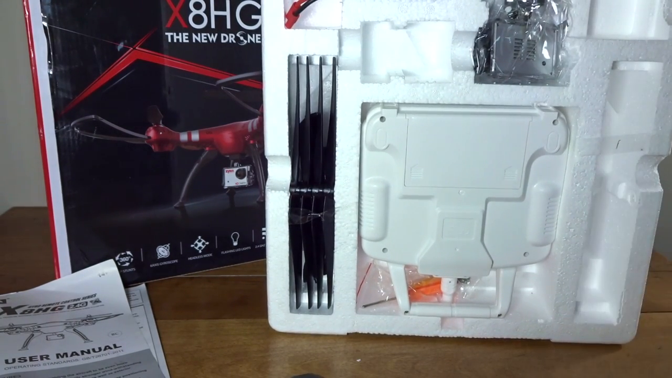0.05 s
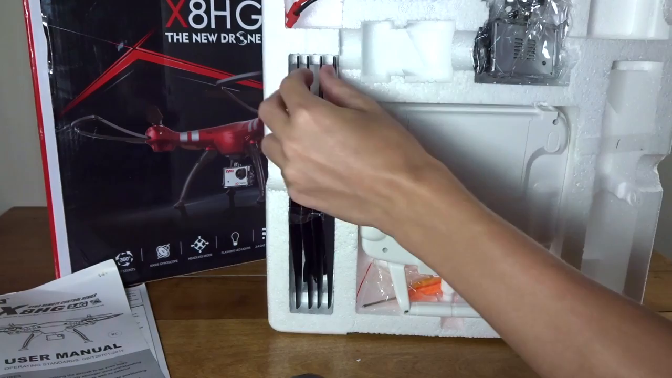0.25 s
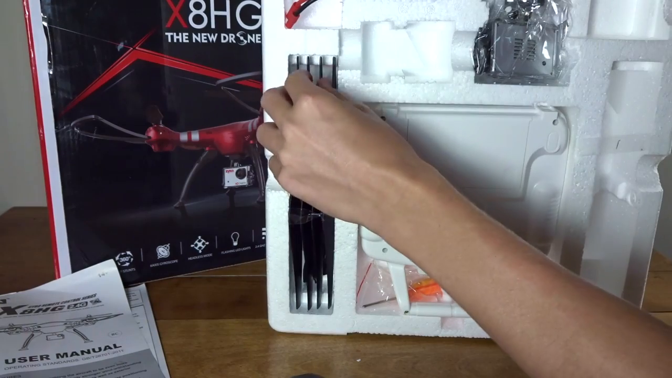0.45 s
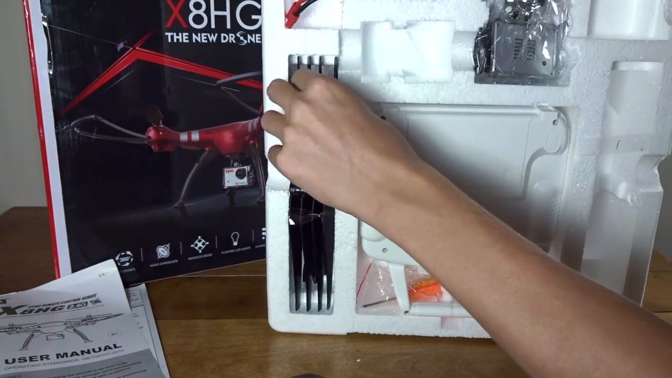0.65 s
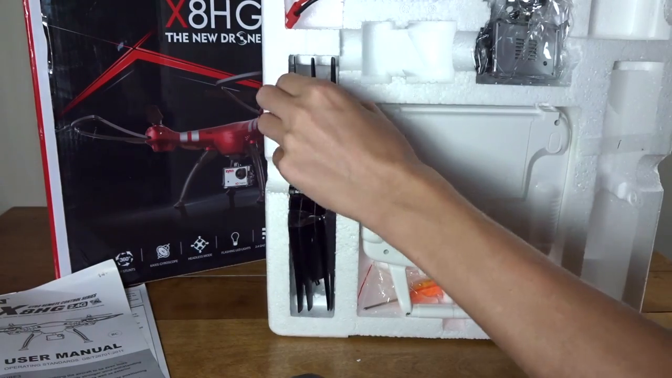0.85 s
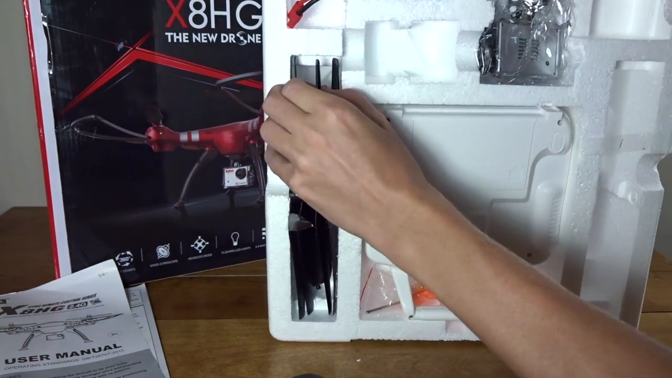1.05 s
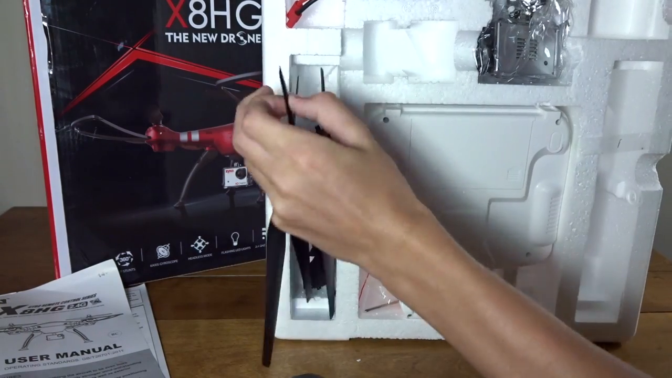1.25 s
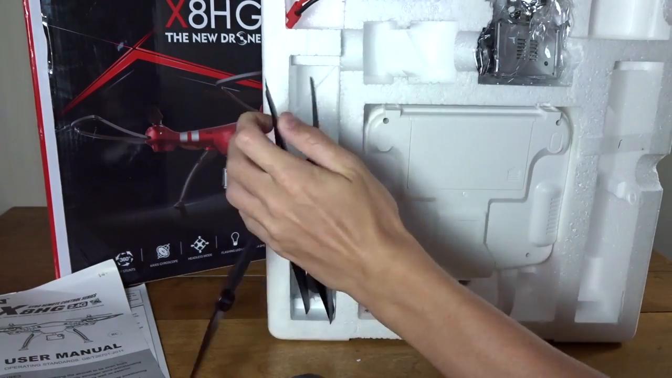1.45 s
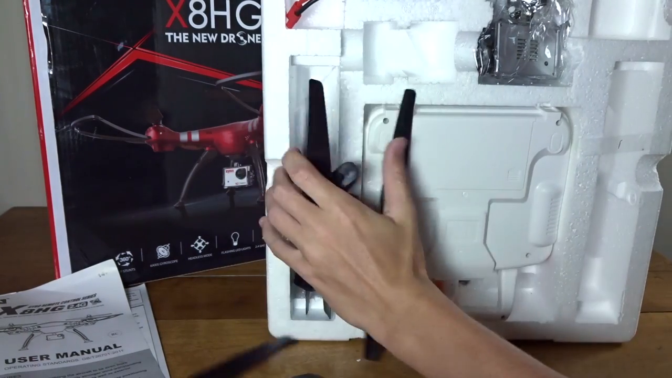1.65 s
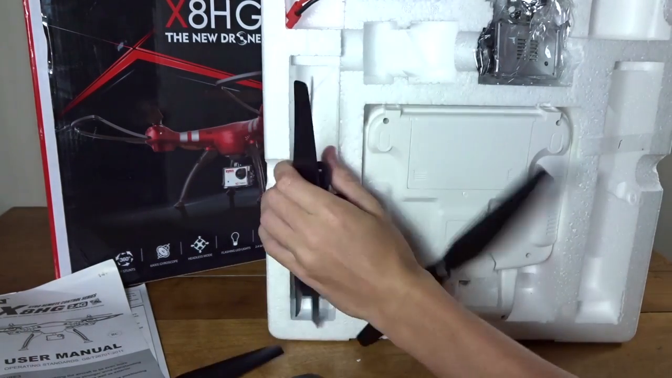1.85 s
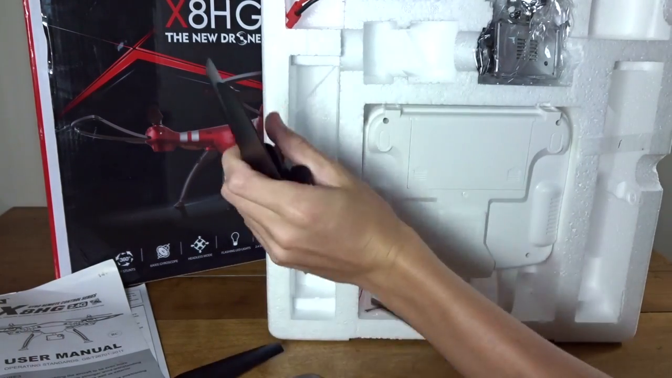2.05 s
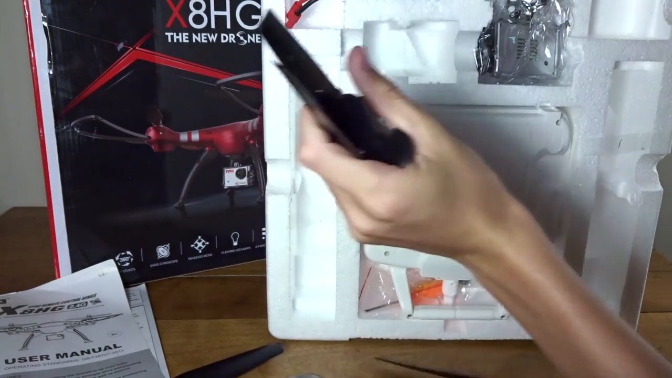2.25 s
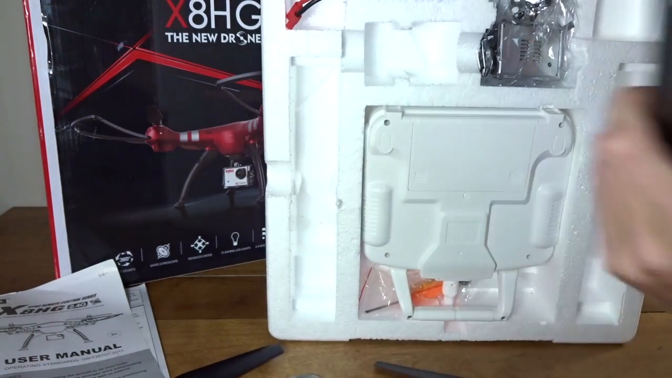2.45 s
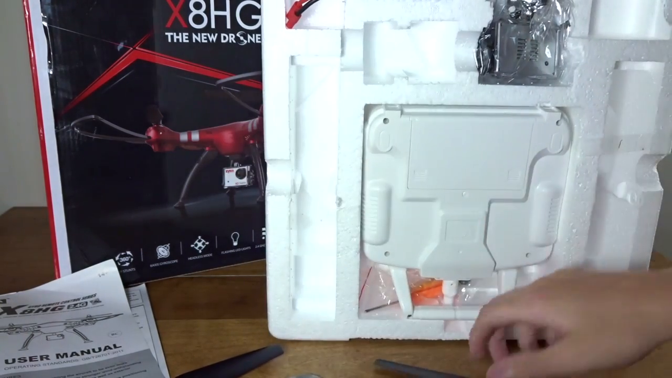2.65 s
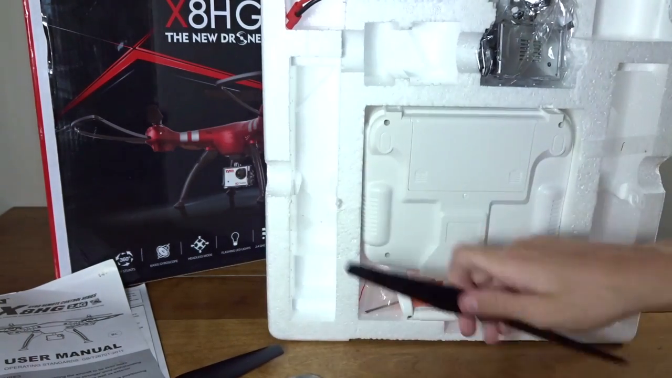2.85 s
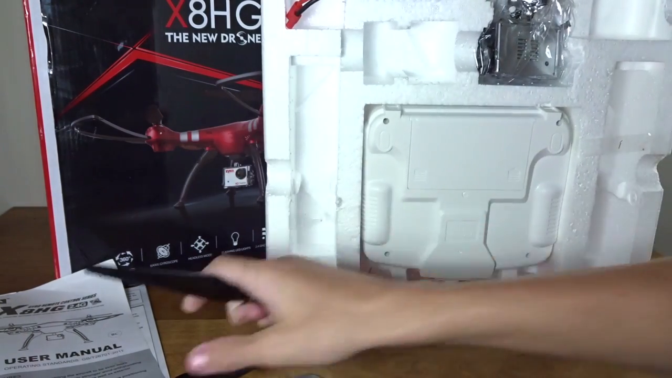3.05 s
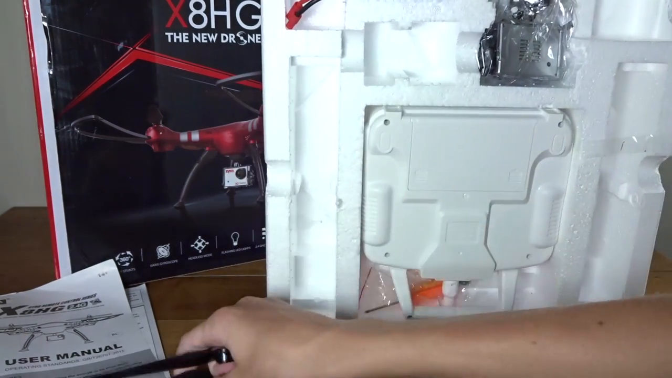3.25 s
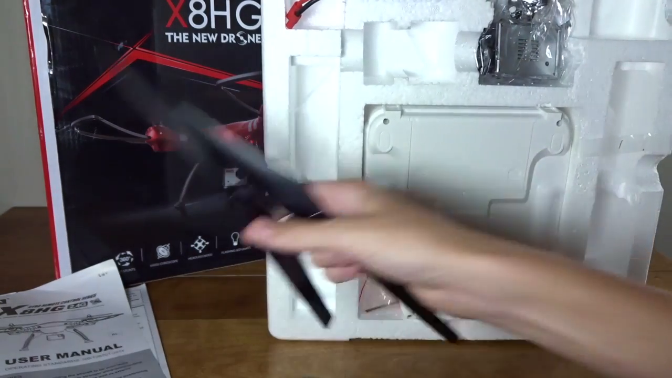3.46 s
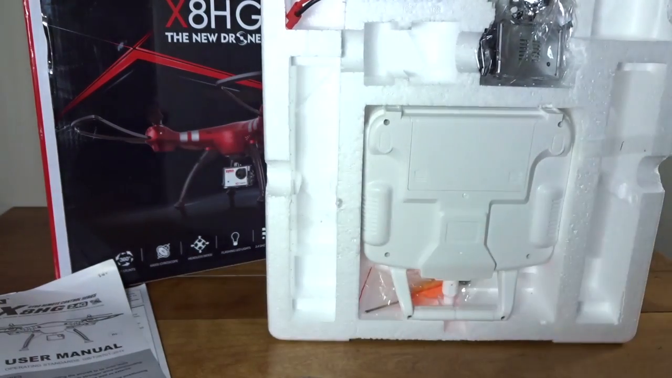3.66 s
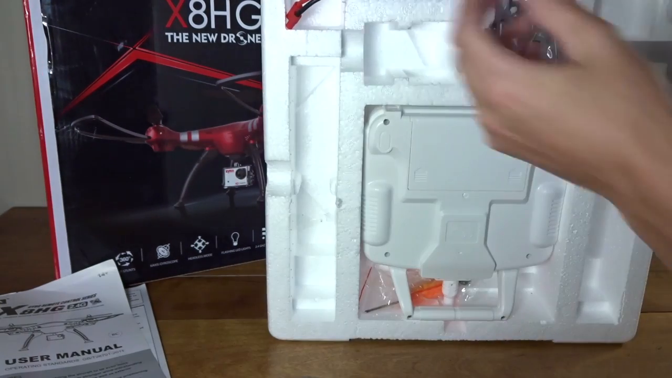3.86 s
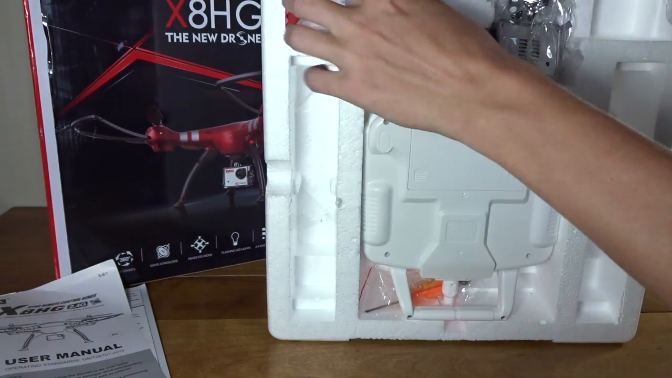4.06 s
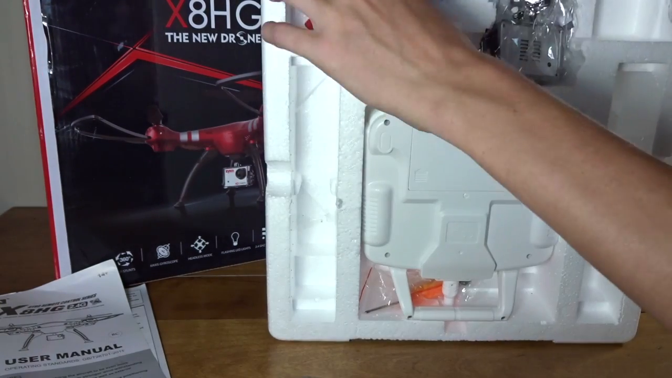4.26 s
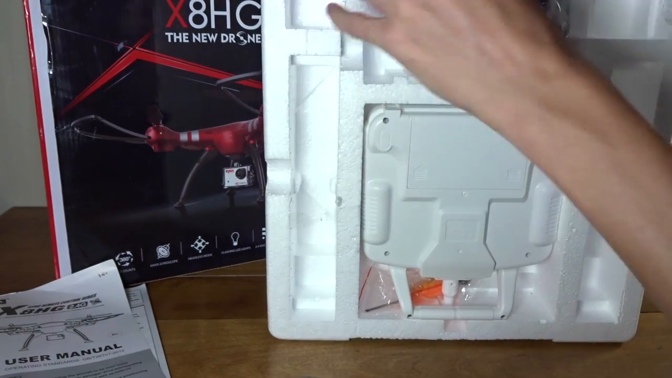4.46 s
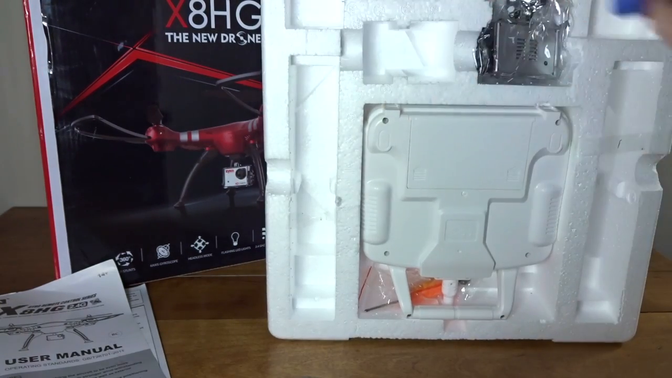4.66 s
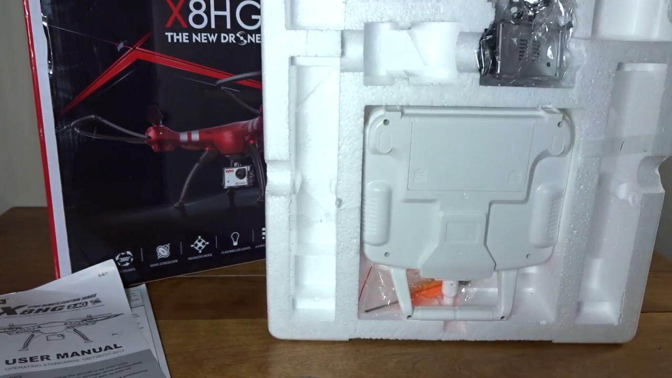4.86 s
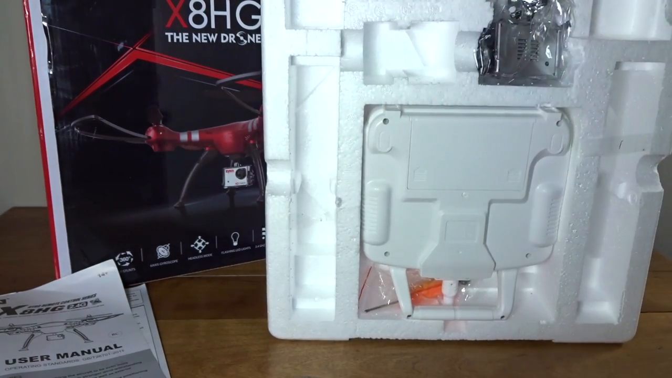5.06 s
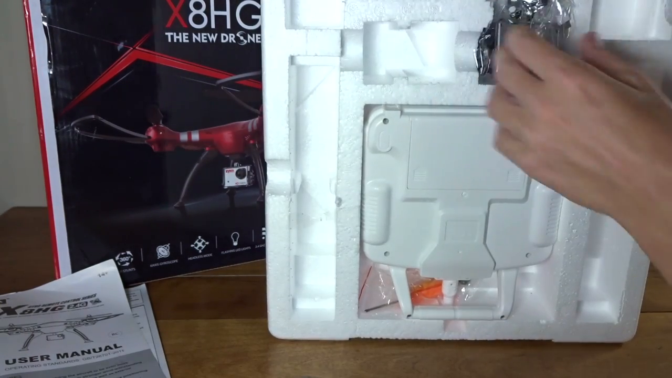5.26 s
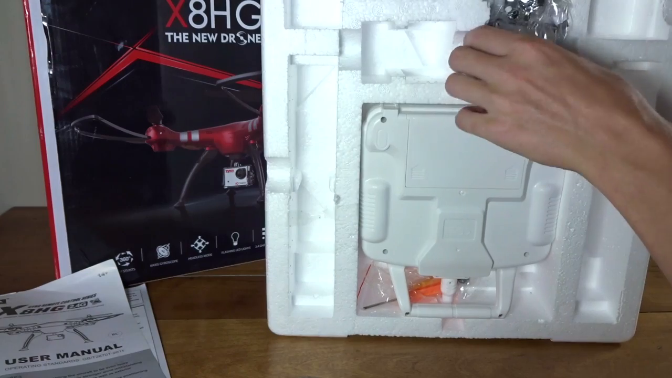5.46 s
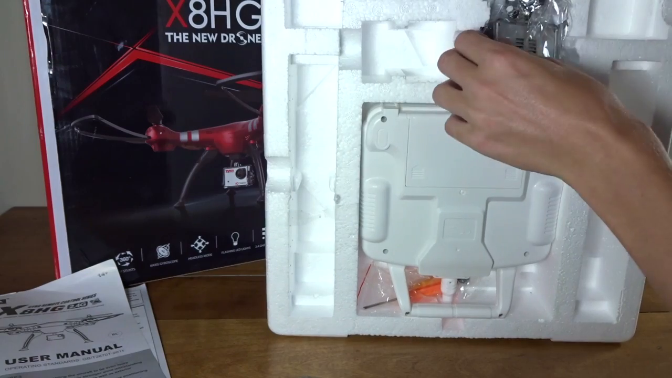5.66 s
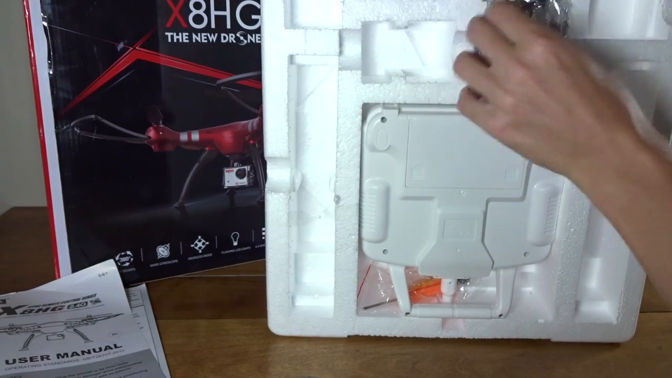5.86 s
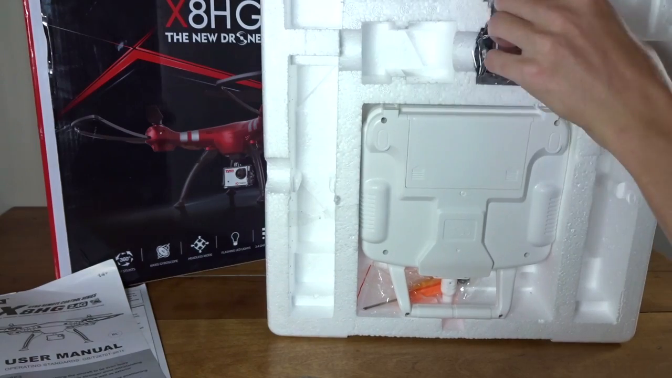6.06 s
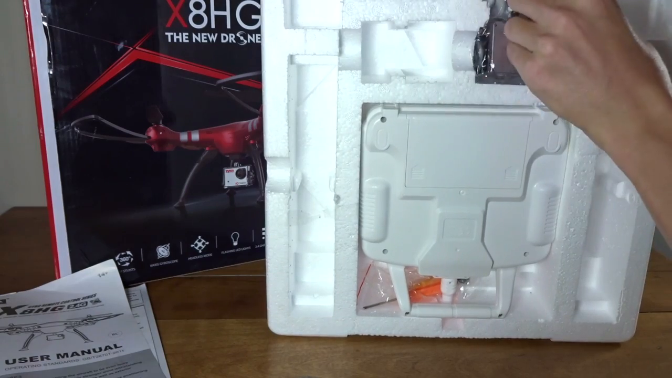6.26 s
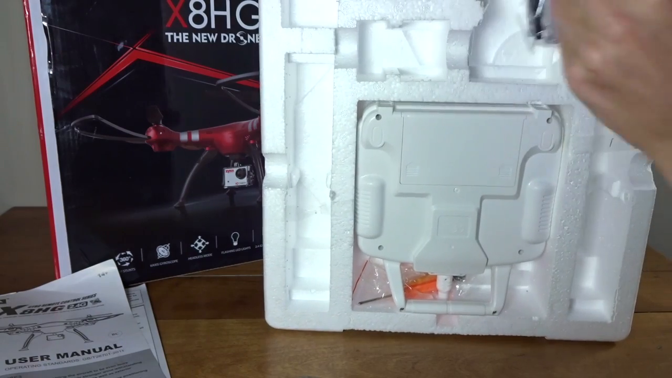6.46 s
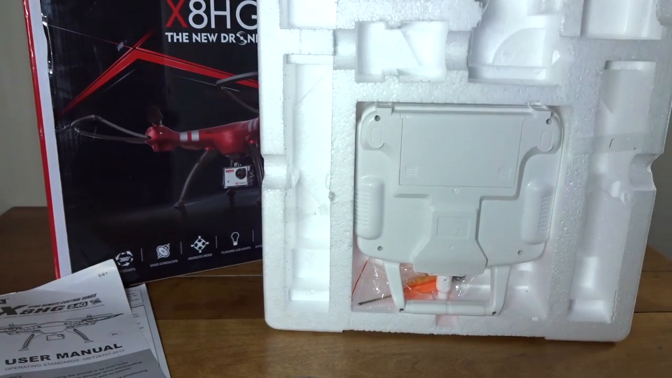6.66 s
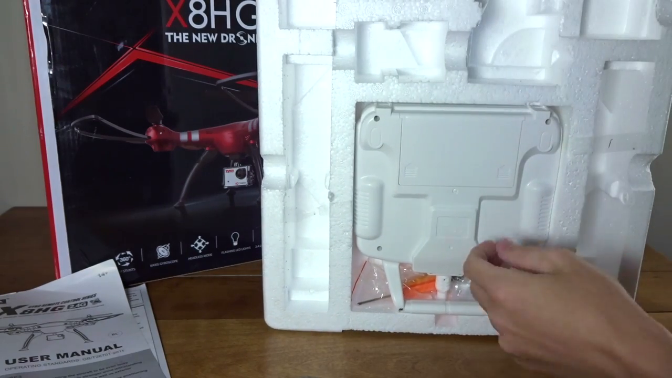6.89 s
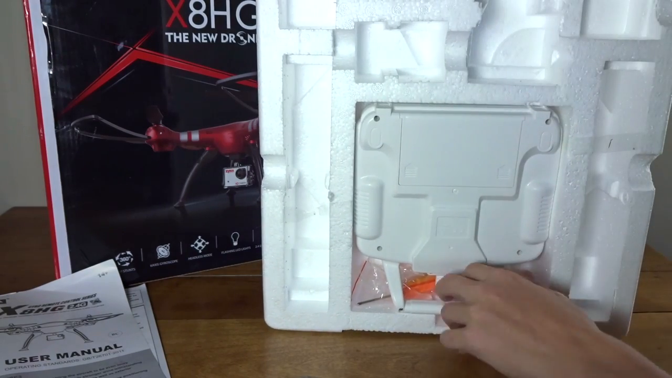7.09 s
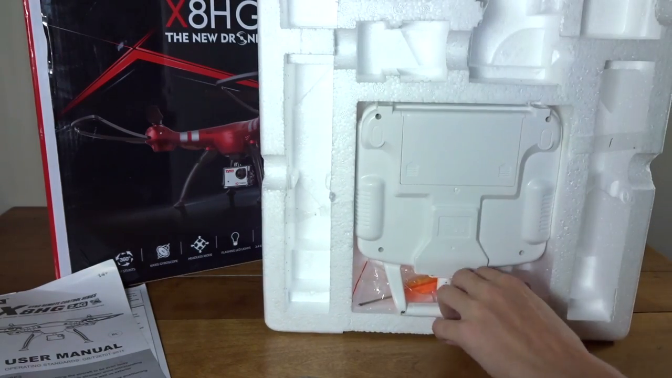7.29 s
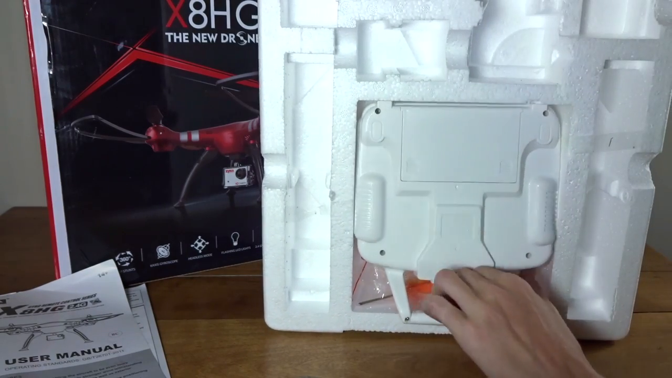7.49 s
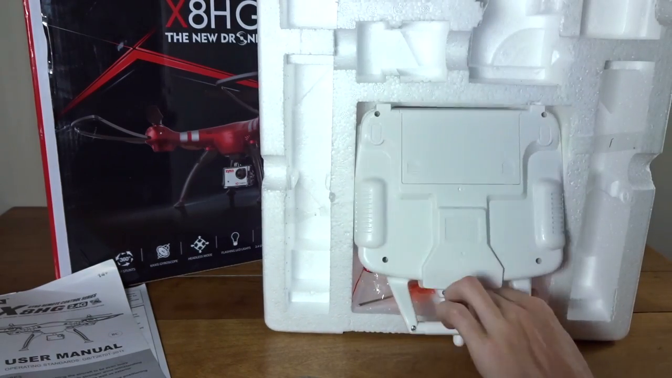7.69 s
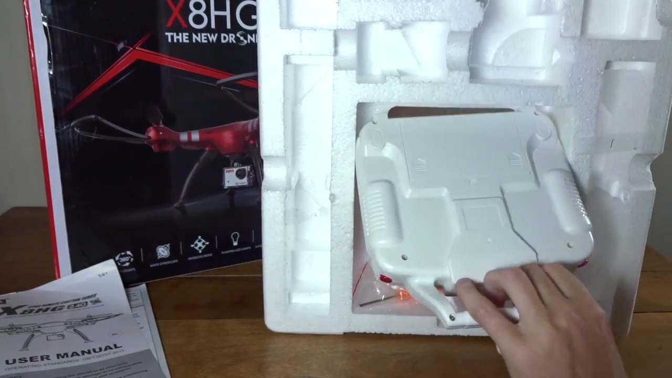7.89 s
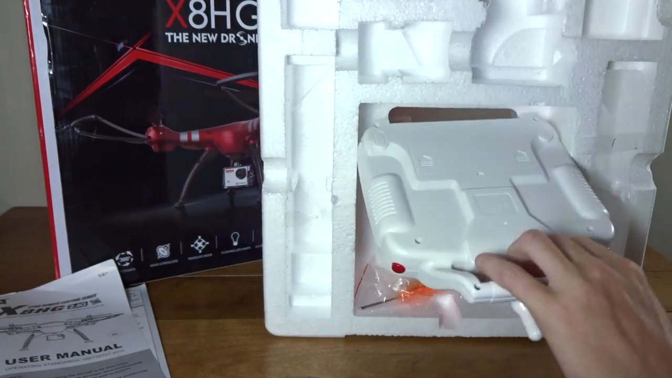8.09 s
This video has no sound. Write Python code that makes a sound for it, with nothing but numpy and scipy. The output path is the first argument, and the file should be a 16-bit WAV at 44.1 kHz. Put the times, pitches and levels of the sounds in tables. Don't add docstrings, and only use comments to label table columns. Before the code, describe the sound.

A small quiet room with soft wide hiss and a barely audible high whistle; handling is close and near centre. At 0.06 s a small hard part snaps slightly right, with an abrupt cut at 0.25. Light foam touches and taps lead to plastic blades being pulled from a hollow foam tray: from 1.3 to 2.5 s dense gritty scrapes, bright ringing clacks, dull knocks and creaks near 1.55 and 1.75. Lighter clacks at 2.85 and 3.3-3.4, then near quiet. Small contacts and foam rubs at 4.3-4.9. From 5.5 to 6.5 s, strong scraping, hollow knocks and sharp plastic ticks; at 6.6-6.9 film crackles crisply at right. Another abrupt cut at 6.89, a pause, then from 7.3 a large shell rubs and drags out, loudest with a creak around 7.6, easing into small squeaks by 8.

```python
import sys
import numpy as np
from scipy import signal
from scipy.io import wavfile
from scipy.ndimage import uniform_filter1d

SR = 44100
rng = np.random.default_rng(int(sys.argv[2]) if len(sys.argv) > 2 else 0)


def store_wav(level_fs):
    pcm = np.round(np.clip(np.atleast_2d(level_fs), -1, 1) * 32767)
    wavfile.write(sys.argv[1], SR, pcm.T.astype(np.int16))


def invert_db(x):
    u = np.asarray(x, float) / 20
    return 10 ** u


N = 358533

SCENE_CHANGES = [
    0,
    .25,
    6.888,
    9,
]
BLADES_GONE_S, BAG_S = 3.7, 6.6

# [full force at t/s, hold/s, force level/dB, lean on the tray/dB, sliding speed/dB]
BLADE_PULLS = [(0.0, 0.024, -45, -17, 5.5), (0.616, 0.017, -58, 14.5, -1), (0.716, 0.015, -52, 9.5, -3),
               (0.766, .01, -51, 5.5, 6), (0.831, 0.024, -38, 3.5, 3), (0.91, 0.14, -44, -3, 4),
               (1.069, 0.087, -41, -5.5, 4), (1.225, 0.057, -51, 6, 7), (1.297, 0.05, -26.5, 3, 2.5),
               (1.489, 0.016, -31, 3, 2.5), (1.471, .01, -38, 7, -2.5), (1.562, 0.043, -30.5, 7, -2.5),
               (1.654, 0.018, -30, 0, 0), (1.703, .02, -29, 1, 0), (1.763, 0.034, -23.5, 4.5, -9),
               (1.815, 0.048, -26.5, -2, -0.5), (1.965, 0.065, -36, -1.5, 4), (2.109, 0.051, -28, -3.5, 4),
               (2.24, 0.013, -32, -1.5, -2), (2.291, 0.042, -29, -0.5, 3), (2.378, 0.031, -30, 1, 4.5),
               (2.486, 0.025, -31, -1.5, -17), (2.57, 0.082, -59, 1, -1), (3.327, 0.04, -44, 5, 3),
               (3.473, 0.037, -58, 6, -4), (3.58, 0.15, -64.5, -2, -2), (3.775, 0.028, -57.5, -2, -14)]
BAG_PULLS = [(5.441, 0.086, -52.5, 5, -5), (5.526, 0.028, -34.5, -5, 1.5), (5.598, 0.026, -27.5, -8.5, 3),
             (5.719, 0.022, -27, -5, 0), (5.81, 0.18, -30.5, -11, 1), (5.937, 0.011, -22.5, -5.5, 3.5),
             (6.012, 0.018, -34.5, -28, 5.5), (6.125, 0.01, -29.5, -14, 6),
             (6.199, 0.048, -24.5, -13, -1.5), (6.3, 0.11, -27.5, -8.5, 8.5), (6.422, 0.11, -26, -8.5, 5.5),
             (6.6, 0.053, -37.5, -26, 3.5), (6.685, 0.024, -36, -17.5, 2.5), (6.75, 0.058, -44.5, -13, -2),
             (6.855, 0.014, -39, -11, -2)]
PART_PULLS = [(4.22, 0.12, -68.5, 14, -18), (4.27, .02, -55, 1, -9), (4.315, 0.014, -39.5, -7.5, 5),
              (4.412, 0.016, -36.5, -4, 3), (4.46, 0.12, -38.5, -12, 4), (4.68, 0.1, -61, 0, 2),
              (4.84, 0.014, -51, 0, 10), (4.892, 0.0017, -34.5, -3, -1.5), (7.19, 0.035, -62.5, 4, -12),
              (7.33, 0.017, -45.5, 3, -5), (8.07, .07, -42.5, -5, 0), (7.419, 0.0053, -33, -3.5, 1.5),
              (7.516, 0.079, -30, -3.5, 0.5), (7.615, 0.034, -20.5, -11.5, -5), (7.7, 0.03, -31, -2.5, 0.5),
              (7.807, 0.095, -25.5, -9.5, 0), (7.968, 0.045, -29, -7, 4.5)]
GRIP_DB_PER_S = (648, 464.5, 338)
LET_GO_DB_PER_S = (185.5, 220, 310.5)

# [f/Hz, width/Hz, level/dB]
TRAY_MODES = [(223, 60, -8), (470, 103, -2.5), (624, 52, -4.5), (841, 139, 1), (923, 146, -1.5),
              (1090, 168, -0.5), (1260, 36, -1.5), (1341, 61, -0.5)]
BLADE_MODES = [(1980, 30, -27.5), (2027, 60, 26), (2730, 290, 8.5), (3287, 40, 22), (3520, 57, 1),
               (3974, 250, 20.5), (5190, 350, 9.5), (5800, 57, 26), (6530, 31, 14.5)]
# [f/Hz, level/dB]
BOOM = [(30, -47), (130, -16.5), (250, -5.5), (600, 3), (1350, 2), (1600, -3), (2400, -47.5)]
SCRAPE = [(900, -45.5), (1700, 3.5), (4000, 5.5), (6500, -0.5), (8500, -12.5), (12000, -47)]
FIZZ = [(4000, -40.5), (7000, -10.5), (10000, -7), (13000, -4), (15500, -8), (20000, -5.5)]

# [t/s, peak level/dB, ring f/Hz, sharp edge level/dB, t60/s]
CLACKS_IN_TRAY = [(0.59, -41.5, 2090, -6, .11), (0.7123, -33, 1730, -3, 0.05), (0.821, -24, 3620, 1, 0.08),
                  (0.838, -23, 4120, 6, 0.045), (1.285, -27.5, 3160, 18, 0.13),
                  (1.3076, -19, 2840, 6, 0.14), (1.44, -21.5, 3220, -4, 0.074),
                  (1.494, -13, 2210, -23.5, 0.12), (1.534, -6.5, 2300, -11, .06),
                  (1.554, -10.5, 1900, -12, 0.091), (1.572, -12, 1840, -24.5, 0.092),
                  (1.7, -9.5, 4300, -10, 0.095), (1.752, -7.5, 1850, -21.5, 0.092),
                  (1.808, -11.5, 5200, -15.5, 0.096), (1.841, -8.5, 3390, 0, 0.037)]
CLACKS_IN_HAND = [(0.0552, -12.5, 3060, -22, 0.014), (0.063, -18, 3000, -26, 0.011),
                  (0.2033, -34, 3100, -31, 0.14), (2.0488, -15.5, 3690, -5.5, 0.21),
                  (2.1007, -8.5, 3480, -5, 0.019), (2.115, -11, 3520, 1, 0.11),
                  (2.204, -11.5, 5800, 0, 0.092), (2.259, -14, 6380, 4, 0.045),
                  (2.289, -12, 4340, -8, 0.23), (2.369, -13, 2000, -10, 0.39),
                  (2.469, -13.5, 5800, 1, 0.086), (2.498, -17, 4440, -20, 0.05),
                  (2.847, -21, 5150, 1.1, 0.1), (2.9084, -19.5, 3280, -1, 0.047),
                  (3.1047, -36, 4970, -1, 0.11), (3.3027, -29.5, 3400, 7, 0.17),
                  (3.3293, -18, 4130, -1.5, 0.084), (3.3627, -18, 2120, 4.5, 0.089),
                  (3.41, -22.5, 4300, 4, 0.08)]
CLACKS_OF_PARTS = [(4.396, -26.5, 1950, -1, 0.073), (4.8253, -26.5, 3020, 3, 0.11),
                   (4.8543, -18.5, 2150, 0, 0.06), (4.8789, -15.5, 3610, 0.5, 0.064),
                   (5.42, -37, 2620, -21, 0.046), (5.458, -31.5, 2360, -1, 0.32),
                   (5.7105, -16.5, 1980, 5, 0.068), (5.7433, -11.5, 1680, -12, 0.016),
                   (5.801, -14.5, 1580, -21, 0.077), (5.993, -13, 3930, 2.5, 0.083),
                   (6.11, -19.5, 3800, -1, 0.18), (6.203, -9.5, 2450, -13, 0.061),
                   (6.2752, -12.5, 3350, 2.5, 0.28), (6.35, -8.5, 2260, -16, 0.057),
                   (6.849, -25, 3040, -6, 0.05), (7.18, -43.5, 2810, -4, 0.076),
                   (7.305, -32, 2010, -17, 0.11), (7.367, -35, 4500, 10, .03)]
TIP_HZ = (4300, 5370, 5200)
# share of tip ring [factor], rise [s]
TIP_SHARE = (.25, 0.7, 0.28)
CLACK_RISE_S = (0.0023, 0.00061, 0.00075)

# [t/s, peak level/dB, f/Hz]
TAPS = [(0.353, -41.5, 620), (0.537, -44, 620), (0.71, -16.5, 1100), (0.834, -16.5, 690),
        (0.886, -18, 1216), (0.772, -32, 1220), (0.968, -28.5, 1230), (1.234, -32.5, 694),
        (1.202, -32.5, 600), (1.292, -7.5, 650), (1.327, -16.5, 1190), (1.497, -11.5, 1080),
        (1.556, -3.5, 1140), (1.656, -13.5, 1170), (1.752, -10.5, 1110), (2.026, -15, 810),
        (2.1, -12.5, 1090), (3.339, -23, 1290),
        (4.4, -20, 563), (4.887, -14, 1383), (5.49, -27.5, 776), (5.71, -12.5, 940), (5.74, -6, 787),
             (5.799, -7, 856), (5.908, -14, 790), (5.93, -27, 990), (4.37, -28.5, 1205), (6.192, -27, 1120),
             (6.225, -12.5, 1106), (6.273, -13, 1260), (6.454, -14.5, 1160), (6.512, -16, 970),
             (7.182, -38.5, 670)]
THUMPS = [(0.589, -28, 435), (0.62, -26.5, 720), (1.142, -20, 1164), (6.858, -31.5, 450),
          (2.11, -20.5, 596), (0.701, -22.5, 1120), (0.942, -22.5, 1120), (1.705, -29, 840),
          (1.79, -10.5, 1000), (2.828, -28.5, 294), (2.855, -26.5, 490), (4.235, -34, 1320),
          (4.305, -27.5, 1230), (4.49, -24, 666), (4.584, -25.5, 1270), (4.832, -29, 1020),
          (4.855, -17.5, 1090), (5.584, -25, 1110), (7.302, -33, 970), (7.419, -19, 1130)]

# [t/s, peak level/dB, f/Hz]
SNAPS = [(6.6001, -24, 7600), (6.6578, -17.0, 7300), (6.6634, -16, 6740), (6.6679, -16, 7900),
         (6.6725, -17.0, 7300), (6.6813, -12.5, 6900), (6.6904, -9, 5400), (6.7261, -22.0, 8200),
         (6.7456, -27.0, 7200), (6.7535, -21.0, 6300), (6.7635, -26.0, 7700), (6.7838, -29, 6700),
         (6.791, -22.5, 6300), (6.7991, -20, 5200), (6.8096, -23, 6700), (6.8206, -28, 6400),
         (6.8369, -26.0, 6400), (6.8437, -24, 6800), (6.8502, -24, 4000), (6.876, -24, 5600)]
TICKS = [(1.2836, -11, 10300), (0.0558, -10, 4600), (1.703, -6.5, 4500), (1.8108, -4, 4350),
         (2.106, -15, 9000), (2.1827, -10.5, 9000), (2.2857, -11, 11000), (2.3683, -13.5, 11000),
         (2.373, -7, 10500), (2.4487, -18.5, 9000), (0.062, -15, 4200), (2.8463, -19, 8000),
         (4.329, -26.5, 5000), (4.417, -20, 4000), (4.494, -21, 3500), (5.5334, -25, 10300),
         (5.6107, -9.5, 7300), (5.7105, -9, 9300), (5.8, -10.5, 3280), (5.993, -8.5, 7600),
         (6.1174, -5, 12600), (6.2035, -9.5, 3000), (6.2745, -10.5, 5000), (6.347, -10, 5000),
         (6.498, -10, 4500), (6.5232, -6, 5170), (7.81, -11, 4100)]

# [t60/s, level/dB, modes [f/Hz, width/Hz, level/dB]]
CREAKS = [
    (0.38, -17, [(1389, 80, -1.5), (1836, 60, -1), (2686, 50, -0.5), (3220, 65, -4), (3465, 79, -1.5), (4040, 60, -4), (5400, 80, -9)]),
    (.45, -21, [(474, 29, -3.5), (1090, 90, -2), (1850, 62, -4.5), (2520, 75, -6), (2715, 51, -8), (3390, 61, -6.5), (5780, 60, -4.5)]),
    (0.89, -41, [(280, 15, -3), (607, 23, 3), (944, 30, -5), (1060, 40, -9), (1357, 30, -14), (1540, 30, -4), (2024, 35, -12)]),
    (2.2, -56, [(482, 40, 0), (340, 79, -3.5), (620, 37, -6), (1100, 40, -10), (1800, 220, -3)]),
    (.55, -24, [(1230, 65, -1), (2430, 65, -2), (2880, 76, -4), (3310, 90, -1.5), (4060, 86, -1)]),
]
CREAK_S = (1.553, 1.755, 2.5, 3.47, 7.6)
CREAK_RISE_S = (.006, .008, .06, .02, .03)
# [t/s, length/s, f/Hz, width/Hz, level/dB]
SQUEAKS = [(2.425, 0.16, 1560, 42, -29), (2.8, 0.11, 5400, 870, -50), (3.115, 0.093, 13240, 1220, -45),
           (3.1, 0.051, 440, 45, -39.5), (3.468, 0.076, 470, 34, -39.5), (3.8, 0.39, 1200, 58, -62.5),
           (5.5, 0.057, 12900, 900, -35), (7.894, 0.16, 4060, 129.6, -37), (2.885, 0.035, 1054, 70, -45),
           (2.838, 0.037, 1100, 66, -40), (4.52, .07, 4700, 200, -41), (4.57, 0.092, 1200, 90, -51),
           (2.2, 0.039, 5750, 160, -21), (5.935, 0.076, 2220, 400, -26), (6.11, .035, 12800, 900, -18.5),
           (0.61, 0.036, 1320, 56, -38), (0.92, 0.068, 704, 65, -33), (7.537, 0.26, 900, 430, -24.5),
           (7.776, 0.24, 1006, 400, -25)]
# [f/Hz, level/dB, width/Hz]
LATCH_MODES = [(3060, 2, 220), (4500, -3, 250), (5070, 4, 380), (6400, -13, 1100)]

# [f/Hz, t60/s]
ROOM_DECAY = [(200, 0.66), (530, 0.49), (1390, 0.33), (3680, 0.31), (9700, 0.32), (16000, 0.18)]
# [f/Hz, level/dB]
ROOM_WIDTH = [(60, -13), (200, -21), (700, -12.5), (1300, -6.5), (2400, -12), (5000, -25.5), (9000, -20.5),
              (15000, -43)]
# [f/Hz, density level/dB]
TONE_MID = [(30, -33.5), (290, -2.5), (600, 2), (1200, 0), (2500, -1.5), (5000, -6.5), (15000, -11)]
TONE_SIDE = [(30, -45.5), (323, -12.5), (500, -6.5), (1300, -6), (3000, -18), (7900, -33.5), (8500, -60.5)]
# [f/Hz, level/dB]
WHINE = (15735, -77)


def evened(x):
    return x / np.sqrt(np.mean(x ** 2) + 1e-20)


def read(points, hz):
    f, value = np.transpose(points)
    return np.interp(np.log(hz + 1), np.log(f + 1), value)


def add(mix, s, sound):
    part = mix[round(s * SR):][:len(sound)]
    part += sound[:len(part)]


def decay(t, t60):
    return invert_db(-60 * t / t60)


def resonate(x, hz, width):
    r = np.exp(-np.pi * width / SR)
    return signal.lfilter([1 - r, 0, r - 1], [1, -2 * r * np.cos(2 * np.pi * hz / SR), r * r], x)


def colour(x, points, patchy_db, size=256):
    hz, t, z = signal.stft(x, SR, nperseg=size, window="cosine")
    patches = uniform_filter1d(rng.standard_normal(z.shape[::-1]), size=7, axis=0)
    patches = evened(uniform_filter1d(patches, size=4, axis=1)).T
    z = z * invert_db(read(points, hz)[:, None] + patchy_db * patches)
    return evened(signal.istft(z, SR, nperseg=size, window="cosine")[1][:N])


def body(x, modes, ring):
    rings = sum((-1) ** k * invert_db(db) * resonate(x, hz, width) for k, (hz, width, db) in enumerate(modes))
    return x + ring * evened(rings)


def rubbing():
    size = invert_db(2.1 * np.minimum(rng.exponential(1, N), 4)) * rng.choice([-1, 1], N)
    clumps_db = 1.2 * evened(uniform_filter1d(rng.standard_normal(N), size=300))
    slipping = rng.random(N) < 9000 / SR
    slips = evened(size * slipping * invert_db(clumps_db))
    ring = np.where(np.arange(N) < BLADES_GONE_S * SR, .55, .1)
    boom = colour(body(slips, TRAY_MODES, 0.61), BOOM, 3.15, size=1024)
    scrape = colour(body(slips, BLADE_MODES, ring), SCRAPE, 2.5, size=512)
    layers = [boom, scrape, colour(slips, FIZZ, 2.1)]
    t = np.arange(0, N, 32) / SR
    return sum(np.interp(np.arange(N) / SR, t, level) * x for level, x in zip(strokes(t), layers))


def strokes(t):
    pulls = zip((BLADE_PULLS, BAG_PULLS, PART_PULLS), GRIP_DB_PER_S)
    rows = [(*row, grip) for table, grip in pulls for row in table]
    s, hold, force_db, lean_db, speed_db, grip = np.transpose(rows)[..., None]
    uncut = np.searchsorted(SCENE_CHANGES, t, "right") == np.searchsorted(SCENE_CHANGES, s, "right")
    grip_db = force_db - grip * np.maximum(s - t, 0)
    after = np.maximum(t - s - abs(hold), 0)
    return [np.sqrt((uncut * invert_db(2 * (grip_db + db - fall * after))).sum(0))
            for db, fall in zip((lean_db, 0, speed_db), LET_GO_DB_PER_S)]


def clacks():
    out, t = np.zeros(N), np.arange(6000) / SR
    edge_filter = signal.butter(4, 7000, "high", fs=SR, output="sos")
    places = zip((CLACKS_IN_TRAY, CLACKS_IN_HAND, CLACKS_OF_PARTS), TIP_HZ, TIP_SHARE, CLACK_RISE_S)
    rows = [(*row, *place) for table, *place in places for row in table]
    noises = rng.standard_normal((len(rows), 2, len(t)))
    for (s, db, low_hz, edge_db, t60, tip_hz, share, rise), (a, b) in zip(rows, noises):
        t60 = max(t60, .005)
        high_hz = tip_hz * np.exp(.08 * np.tanh(b[-1]))
        a = a * np.minimum(t / rise, 1)
        rattle = a * (decay(t, t60) + .6 * decay(t, .005))
        rings = evened(resonate(rattle, low_hz, 240)) + share * evened(resonate(rattle, high_hz, 399))
        blade = body(evened(rattle), BLADE_MODES, 1.0)
        rings += 1.6 * evened(resonate(blade, low_hz * (high_hz / low_hz) ** share, 3500))
        spots_hz = [low_hz, high_hz, *(np.sqrt(low_hz * high_hz) * np.exp(.6 * np.tanh(b[-7:-1])))]
        first = a * decay(t, 0.0032)
        rings += 0.63 * evened(sum(resonate(first, hz, 53) for hz in spots_hz))
        edge = signal.sosfilt(edge_filter, b * (decay(t, 0.93 * t60) + 1.4 * decay(t, 0.0023)))
        clack = rings / abs(rings).max() + invert_db(edge_db + 4.0) * edge / abs(edge).max()
        add(out, s, invert_db(db - 0.5) * clack)
    return out


def knocks():
    out, t = np.zeros(N), np.arange(8000) / SR
    tap_thud_db, thump_thud_db = -29.5, -7
    rows = [(*row, tap_thud_db) for row in TAPS]
    rows += [(*row, thump_thud_db) for row in THUMPS]
    for (s, db, hz, thud_db), a in zip(rows, rng.standard_normal((len(rows), len(t)))):
        push = a * np.minimum(t / .0025, 1) ** 2 * decay(t, .022)
        tray = resonate(body(evened(push), TRAY_MODES, 0.41), 630, 1410)
        rings = evened(resonate(push, hz, 67)) + 0.74 * evened(tray)
        rings = resonate(resonate(rings, 400, 1100), 400, 2600)
        thud = resonate(resonate(a * decay(t, 0.098), 245, 150), 260, 220)
        knock = rings / abs(rings).max() + invert_db(thud_db - 3.5) * thud / abs(thud).max()
        add(out, s, invert_db(db - 4.0) * knock)
    return out


def crackles():
    out, t = np.zeros(N), np.arange(800) / SR
    snap_t60_s, tick_t60_s = 0.0082, .014
    rows = [(*row, snap_t60_s) for row in SNAPS] + [(*row, tick_t60_s) for row in TICKS]
    for (s, db, hz, t60), a in zip(rows, rng.standard_normal((len(rows), len(t)))):
        snap = resonate(a * decay(t, t60), hz, .6 * hz)
        add(out, s, invert_db(db - 2) * snap / abs(snap).max())
    return out


def creaks():
    out, t = np.zeros(N), np.arange(30000) / SR
    for s, rise, (t60, db, modes) in zip(CREAK_S, CREAK_RISE_S, CREAKS):
        friction = rng.standard_normal(len(t))
        rings = np.zeros(len(t))
        for hz, width, mode_db in modes:
            mode = resonate(resonate(friction, hz, 2 * width), hz, 2 * width)
            rings += invert_db(mode_db) * evened(mode)
        add(out, s, invert_db(db) * decay(t, t60) * np.minimum(t / rise, 1) * evened(rings))
    return out


def squeaks():
    out = np.zeros(N)
    for s, length, hz, width, db in SQUEAKS:
        song = resonate(resonate(rng.standard_normal(16000), hz, width), hz, width)[:round(length * SR)]
        swell = signal.windows.tukey(len(song), .6)
        fade = invert_db(np.linspace(0, -10.5, len(song)))
        add(out, s, invert_db(db) * evened(song) * swell * fade)
    return out


def latch():
    out, t = np.zeros(N), np.arange(12000) / SR
    rattle = rng.standard_normal(len(t)) * decay(t, 0.22)
    rings = sum(invert_db(db) * evened(resonate(rattle, hz, width)) for hz, db, width in LATCH_MODES)
    add(out, .058, invert_db(-15) * rings / abs(rings).max())
    return out


def room():
    taps = np.zeros((2, SR // 2))
    at = np.arange(150, SR // 2 - 20, 20) + rng.integers(0, 20, (2, (SR // 2 - 151) // 20))
    np.put_along_axis(taps, at, rng.choice([-1., 1.], at.shape), 1)
    hz, t, z = signal.stft(taps, SR, nperseg=256)
    z = z * decay(t, read(ROOM_DECAY, hz)[:, None])
    z[1] *= invert_db(read(ROOM_WIDTH, hz)[:, None])
    tail = signal.istft(z, SR, nperseg=256)[1]
    return tail / np.linalg.norm(tail[0])


def room_tone():
    mid = invert_db(-61) * colour(rng.standard_normal(N), TONE_MID, 1.0, size=2048)
    side = invert_db(-56.5) * colour(rng.standard_normal(N), TONE_SIDE, 0.92, size=2048)
    whine_hz, whine_db = WHINE
    whistle = np.sqrt(2) * invert_db(whine_db) * np.sin(2 * np.pi * whine_hz * np.arange(N) / SR)
    return np.array([mid + whistle, side])


def scene():
    plastic = clacks() + crackles()
    hands = rubbing() + plastic + knocks() + creaks() + squeaks() + latch()
    t = np.arange(N) / SR
    cuts = [slice(round(a * SR), round(b * SR)) for a, b in zip(SCENE_CHANGES, SCENE_CHANGES[1:])]
    spots = hands * np.cos(2 * np.pi * t), hands * np.sin(2 * np.pi * t)
    echoes = 0
    for x, tail in zip(spots, (room(), room())):
        stretches = [signal.oaconvolve(x[None, cut], tail, axes=1)[:, :len(x[cut])] for cut in cuts]
        echoes = echoes + np.hstack(stretches)
    aside = (t < SCENE_CHANGES[1]) | (t > BAG_S) & (t < SCENE_CHANGES[2])
    lean = np.where(aside, -.14, -.015)
    direct = np.array([hands, lean * hands - .07 * plastic])
    mid, side = direct + invert_db(-10.0) * echoes + room_tone()
    return np.array([mid + side, mid - side])


def roll_off(x):
    return signal.sosfilt(signal.butter(12, 16810, fs=SR, output="sos"), x)


def record(dry):
    thin = signal.sosfilt(signal.butter(1, 70, "high", fs=SR, output="sos"), dry)
    edge_hz, leak_hz = 15880, 16750
    low, leak = (signal.firwin(1023, hz, window=("kaiser", 7), fs=SR) for hz in (edge_hz, leak_hz))
    band_limit = low + invert_db(-42.0) * (leak - low)
    mix = signal.oaconvolve(thin, band_limit[None], "same")
    return roll_off(mix)


dry = scene()
out = record(dry)
store_wav(out)
```